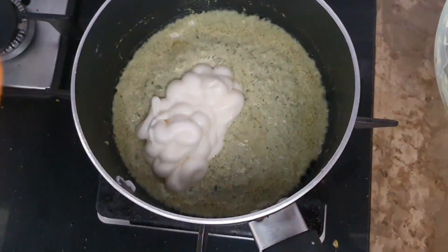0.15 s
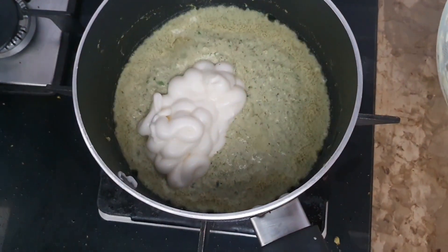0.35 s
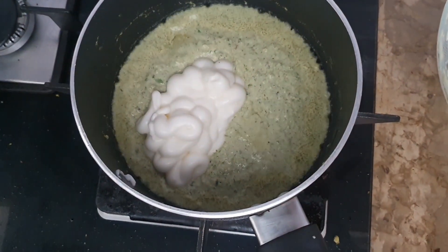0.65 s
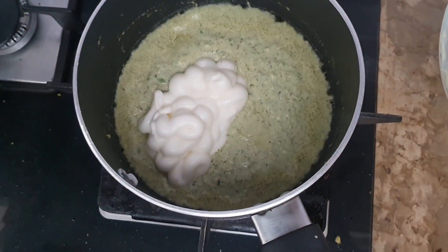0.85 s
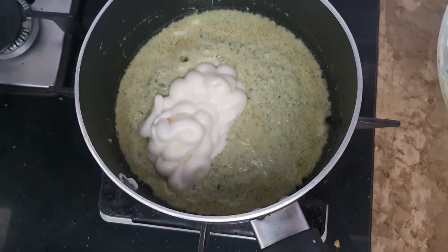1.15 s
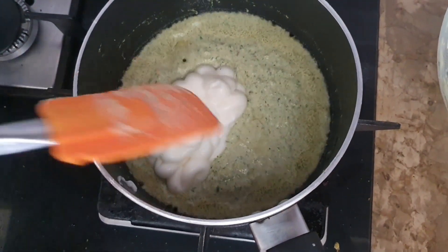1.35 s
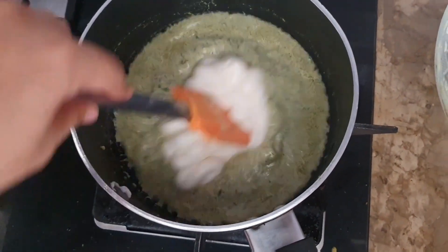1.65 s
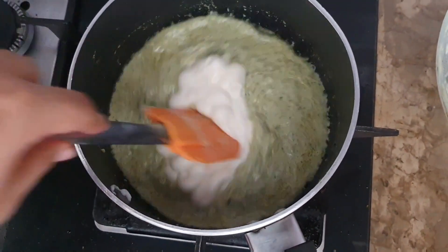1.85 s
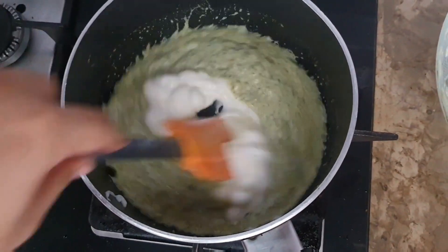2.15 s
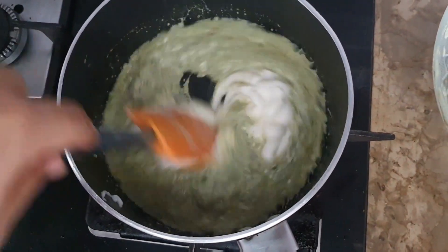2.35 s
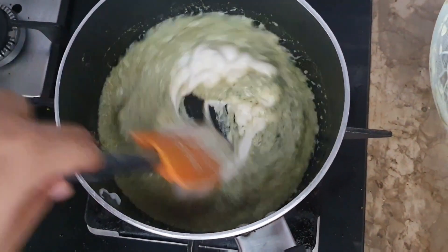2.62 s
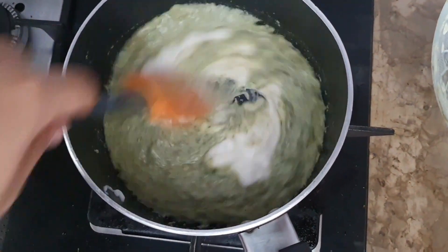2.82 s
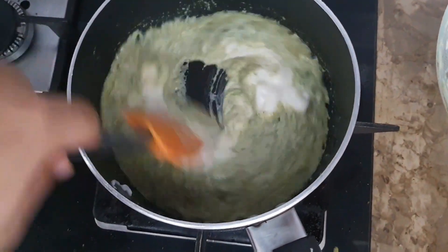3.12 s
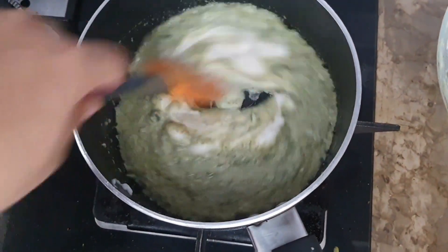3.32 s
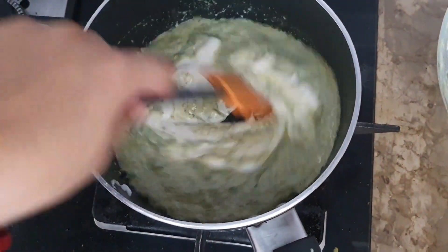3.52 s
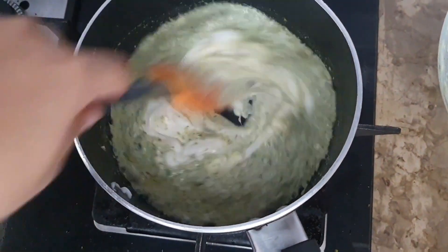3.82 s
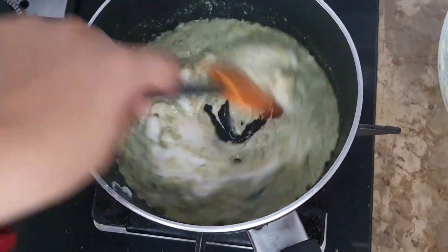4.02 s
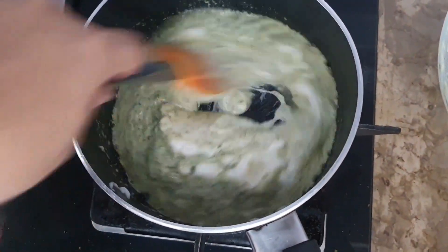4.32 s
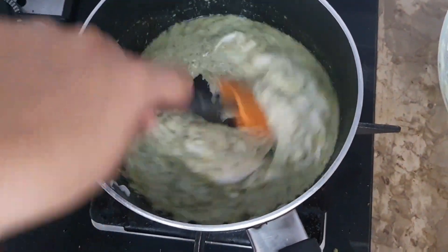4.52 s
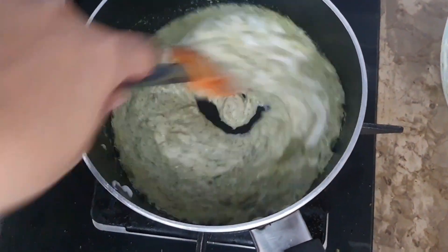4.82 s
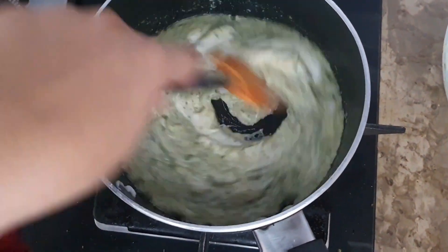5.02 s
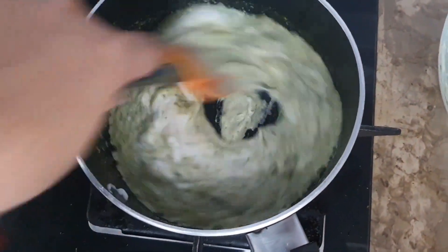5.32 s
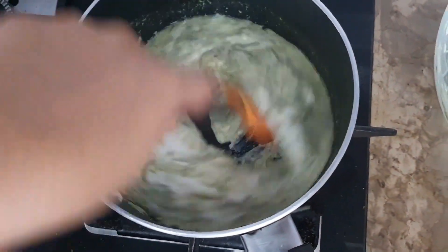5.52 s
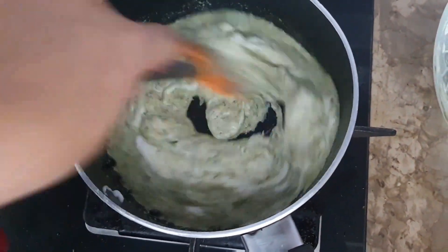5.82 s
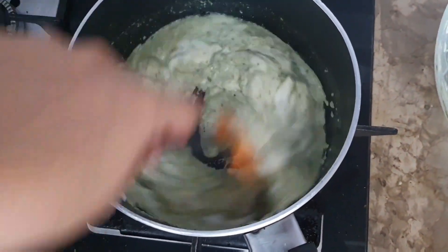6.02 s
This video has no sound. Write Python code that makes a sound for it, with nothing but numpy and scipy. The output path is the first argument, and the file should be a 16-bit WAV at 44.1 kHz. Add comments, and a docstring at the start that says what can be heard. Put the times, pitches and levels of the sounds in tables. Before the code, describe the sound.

Close, wet stirring of thick sauce in a non-stick pan: slippery swishes, brief squeaks and plops, growing duller and quieter towards the end.

```python
"""At a stove, close by, a silicone spatula stirs thick sauce round a non-stick saucepan.
The sauce squelches and the blade rubs the wet coating: noise made of tiny slips, shaped by steady and gliding bands.
The edge sings briefly where it catches (swelling tones), films snap (noise bursts) and pockets plop (rising tones).
The blade knocks softly on the pan, the pan rumbles and bumps on its grate, and a faint mains hum lies underneath."""
import sys
import numpy as np
from scipy import signal
from scipy.fft import rfft, irfft, next_fast_len
from scipy.io import wavfile
from scipy.ndimage import uniform_filter1d, map_coordinates

SR = 44100
rng = np.random.default_rng(int(sys.argv[2]) if len(sys.argv) > 2 else 0)


def unload_audio(sound):
    """Save the sound as a 16-bit wav file, at the path given as the first command line argument."""
    columns = np.transpose(np.atleast_2d(sound))
    # keep every value between -1 and 1, then stretch to whole-number steps
    steps = np.round(np.clip(columns, -1, 1) * 32767)
    wavfile.write(sys.argv[1], SR, steps.astype(np.int16))


N = 272008


def amp(db):
    """Level law: decibels to an amplitude gain."""
    return 10 ** (np.asarray(db) / 20)


def unit(x):
    """Power normalisation: scale to rms 1."""
    return x / np.sqrt(np.mean(x ** 2) + 1e-20)


def along(points, hz):
    """Spectral envelope: (Hz, value) points joined on a logarithmic frequency axis."""
    f, v = np.transpose(points)
    return np.interp(np.log(hz + 1), np.log(f + 1), v)


def curves(rows, t):
    """Temporal envelopes: each column after the time, interpolated at the times t."""
    s, *columns = np.transpose(rows)
    return [np.interp(t, s, column) for column in columns]


def wobble(rate):
    """Random modulation: a smooth curve through random knots, rate of them a second."""
    knots = rng.standard_normal(int(N * rate / SR) + 4)
    return map_coordinates(knots, [np.arange(N) * rate / SR])


def filtered(x, response):
    """Linear filtering: the spectrum of x times a response of frequency."""
    m = next_fast_len(N + SR // 2)
    return irfft(rfft(x, m) * response(np.fft.rfftfreq(m, 1 / SR)), m)[:N]


def bell(hz, centre, width):
    """Resonance: the power curve of one damped mode, width in Hz at half height."""
    return 1 / (1 + (2 * (hz - centre) / width) ** 2)


def swell(t, start, length, attack, release):
    """Linear envelope: rise from 0 to 1, hold and fall back."""
    return np.clip(np.minimum((t - start) / attack, (start + length - t) / release), 0, 1)


def add(track, s, sound):
    """Superposition: mix a sound into the track at s seconds."""
    part = track[max(round(s * SR), 0):][:len(sound)]
    part += sound[:len(part)]


HUM_HZ, HUM_DB = 100, -79  # rms level before it wavers


def mains_hum():
    """Periodic excitation: a pure tone whose level wavers slowly."""
    t = np.arange(N) / SR
    return amp(HUM_DB + 3 * wobble(9)) * unit(np.sin(2 * np.pi * HUM_HZ * t))


# Colour of the grate's rumble. Each row: frequency in Hz, relative level in dB.
GRATE_COLOUR = [(20, -33), (40, -34), (60, -1), (80, -3), (100, 11.5), (120, -8), (160, -5.5), (195, -4),
                (250, -5), (400, -2.5), (650, -7), (1200, -23.5)]
RUMBLE_DB, RUMBLE_FOLLOWS = -65, 0.2  # level at the mean push; dB of rumble per dB of push


def grate_rumble():
    """Structure-borne noise: the pan rumbles on its grate as the sauce is pushed."""
    t = np.arange(N) / SR
    push_db = curves(SAUCE_COURSE, t)[0] + strokes(t)[0]
    rocking = amp(RUMBLE_DB + RUMBLE_FOLLOWS * (push_db - push_db.mean()))
    return rocking * unit(filtered(rng.standard_normal(N), lambda hz: amp(along(GRATE_COLOUR, hz))))


# Bumps of the pan on its grate. Each row: crest in seconds, rms level at the crest in dB.
GRATE_BUMPS = [(1.305, -47.5), (2.53, -51.5), (3.07, -51), (3.15, -56), (3.91, -56), (4.03, -59),
               (5.87, -56), (6.01, -60)]
# Colour of a bump. Each row: frequency in Hz, relative level in dB.
THUD_COLOUR = [(20, -26), (45, -26), (70, -1), (110, 1), (150, -13.5), (220, -13.5), (400, -16.5),
               (700, -46)]
BUMP_S = 0.037  # from the crest to 1/e


def grate_bumps():
    """Impact noise: low noise swells and falls as the pan bumps on its grate."""
    t = np.arange(N) / SR
    bumps = sum(amp(db) * np.exp(-((t - s) / BUMP_S) ** 2) for s, db in GRATE_BUMPS)
    return bumps * unit(filtered(rng.standard_normal(N), lambda hz: amp(along(THUD_COLOUR, hz))))


def kitchen(x, t60=0.046):
    """Reverberation: a short decaying noise response answers from the hob and the walls."""
    t = np.arange(SR // 3) / SR
    tail = rng.standard_normal(len(t)) * amp(-60 * t / t60) * (t > .002)
    return signal.fftconvolve(x, tail / np.linalg.norm(tail))[:N]


# Soft knocks of the blade on the pan. Each row: start in seconds, peak level in dB.
BLADE_KNOCKS = [(5.9865, -27), (6.0005, -36)]
# Modes a knock excites. Each row: frequency in Hz, relative level in dB, 60 dB decay time in seconds.
PAN_KNOCK_MODES = [(572, -1.5, 0.13), (790, 4, 0.03), (1040, -2, 0.04), (1570, -3, .03), (2320, -5, 0.03)]


def knocks(splat_db=-8, splat_hz=820, splat_width_hz=600, splat_t60=0.07):
    """Modal impact: the soft blade bumps the pan and squashes sauce; the lowest mode rings longest."""
    t, out = np.arange(SR // 5) / SR, np.zeros(N)
    hz = np.fft.rfftfreq(len(t), 1 / SR)
    squash = 1 - np.exp(-t / .001)  # the silicone gives way first
    ring = sum(amp(db - 60 * t / t60) * np.sin(2 * np.pi * mode_hz * t)
               for mode_hz, db, t60 in PAN_KNOCK_MODES)
    for s, db in BLADE_KNOCKS:
        noise = rfft(rng.standard_normal(len(t)))
        splat = unit(irfft(noise * bell(hz, splat_hz, splat_width_hz) ** 2, len(t)))
        blow = squash * (ring + amp(splat_db - 60 * t / splat_t60) * splat)
        add(out, s, amp(db) * blow / np.abs(blow).max())
    return out


# Sauce pockets that plop shut behind the blade.
# Each row: start in seconds, level in dB before attack and decay, starting frequency in Hz.
POCKET_PLOPS = [(2.474, -16.5, 948), (3.121, -17, 1200), (3.135, -18, 830), (3.145, -13.5, 1140),
                (3.197, -16, 1230), (3.342, -24, 1150), (3.955, -26, 1140)]


def plops(t60=0.02, rise_per_s=6, attack_s=.0008):
    """Cavity resonance: a closing pocket rings briefly and rises in pitch as it shrinks."""
    t, out = np.arange(SR // 10) / SR, np.zeros(N)
    for s, db, hz in POCKET_PLOPS:
        phase = 2 * np.pi * np.cumsum(hz * (1 + rise_per_s * t)) / SR
        add(out, s, amp(db - 60 * t / t60) * (1 - np.exp(-t / attack_s)) * np.sin(phase))
    return out


# Bubbles and sauce films that snap.
# Each row: start in seconds, level in dB before the common gain and decay, centre frequency in Hz.
FILM_SNAPS = [(0.171, -40, 6960), (0.272, -39, 7300), (0.383, -38, 5500), (0.738, -28.5, 5060),
              (1.5702, -14, 4120), (1.599, -14.5, 4200), (1.6168, -20, 4000), (2.3724, -15, 3970),
              (2.725, -20, 4800), (3.0435, -22, 4330), (3.6689, -29, 5590), (3.775, -31, 7400),
              (4.9308, -25, 1710), (5.011, -35.5, 10300), (5.03, -35.5, 6900), (5.463, -27.5, 1400),
              (5.4858, -23, 4860), (5.631, -28, 3950)]


def snaps(t60=0.052, width_hz=1300, gain_db=-10):
    """Transient noise: each bursting film gives a short crack around its own pitch."""
    t, out = np.arange(SR // 10) / SR, np.zeros(N)
    hz = np.fft.rfftfreq(len(t), 1 / SR)
    for s, db, centre in FILM_SNAPS:
        noise = rfft(rng.standard_normal(len(t)))
        crack = unit(irfft(noise * bell(hz, centre, width_hz), len(t)))
        add(out, s, amp(db + gain_db - 60 * t / t60) * crack)
    return out


# Catches of the edge that make the pan sing. Each row: crest in seconds, rms level there in dB
# before flutter, frequency there in Hz before drift, time from the crest to 1/e in seconds.
EDGE_RINGS = [(0.455, -56.5, 734, 0.041), (0.505, -47.5, 2480, 0.025), (0.552, -46, 3530, 0.0082),
              (1.222, -35, 890, 0.043), (1.248, -27, 1590, 0.03), (1.772, -26, 1650, 0.008),
              (2.134, -30.5, 1513, 0.015), (3.312, -27.5, 1103, 0.015), (3.355, -31.5, 1344, 0.021)]


def rings(wander_hz=27, glide_hz_per_s=-100, rough_db=3):
    """Frictional excitation: each catch of the edge swells into a short, slightly unsteady tone."""
    t, out = np.arange(N) / SR, np.zeros(N)
    drift_hz, flutter_db = wander_hz * wobble(120), rough_db * wobble(140)
    for s, db, hz, length in EDGE_RINGS:
        phase = 2 * np.pi * np.cumsum(hz + drift_hz + glide_hz_per_s * (t - s)) / SR
        out += amp(db + flutter_db) * np.exp(-((t - s) / length) ** 2) * np.sqrt(2) * np.sin(phase)
    return out


# Strokes of the spatula over the slow course. Each row: start in seconds, length in seconds,
# lift of the sauce in dB, lift of the scrape in dB, lift of the hiss and fizz in dB.
SPATULA_STROKES = [(0.429, 0.22, 2, 12, 5.5), (1.122, 0.27, 3, 4.5, 2.5), (1.34, 0.39, 2, 6, 4.5),
                   (1.68, 0.19, 6, 3.5, 0.5), (1.898, 0.28, -1, 7.5, 7), (2.342, 0.26, 4.5, 7, 1.5),
                   (2.688, 0.13, -3.5, 1, 3.5), (3.023, 0.27, 7, -1.5, -3), (3.227, 0.26, 4.5, -1, -3),
                   (3.74, 0.093, 3, 11, 3), (3.808, 0.28, 3, 5, 2), (4.189, 0.23, 5.5, 4.5, 8),
                   (4.438, 0.22, 5, 1.5, 5), (4.594, 0.31, 6.5, 1.5, 3.5), (4.798, 0.15, 6, 9.5, 7),
                   (5.053, 0.21, 3.5, 3.5, 1), (5.426, 0.14, 3.5, -1.5, 3), (5.588, 0.17, 1.5, 3, -2.5),
                   (5.81, 0.19, 2.5, 2.5, 0), (6.086, 0.144, -4.5, 9, 4)]
STROKE_ATTACK_S, STROKE_RELEASE_S = 0.055, 0.083


def strokes(t):
    """Amplitude modulation: the dB lifts that strokes give to the sauce, the scrape and the spray."""
    return sum(np.outer(lifts, swell(t, s, length, STROKE_ATTACK_S, STROKE_RELEASE_S))
               for s, length, *lifts in SPATULA_STROKES)


BAND_FADE_S = 0.05  # each band comes and goes over this time


def moving_bands_db(rows, hz, t):
    """Time-varying filtering: bands that swell, hold steady or glide, and fade, frequency by time."""
    return sum(db * swell(t, s, length, BAND_FADE_S, BAND_FADE_S)
               * bell(hz, np.interp(t, [s, s + length], [from_hz, to_hz]), width)
               for s, length, from_hz, to_hz, width, db in rows)


# Brief squeaks and gulps, where a cavity or the edge rings. Each row: crest in seconds,
# frequency in Hz, width in Hz, time in seconds from the crest to 1/e of the lift, lift in dB.
BRIEF_SQUEAKS = [(0.396, 4270, 900, 0.039, 8), (0.526, 2290, 300, .06, 12.5), (0.527, 3550, 500, 0.11, 11),
                 (0.97, 1340, 170, 0.04, 9), (2.13, 1516, 250, 0.045, 14.5), (2.37, 4060, 475, 0.026, 8),
                 (2.464, 1320, 500, 0.039, 10), (2.563, 5600, 350, 0.09, 10), (2.655, 2630, 400, 0.035, 12),
                 (3.317, 3050, 400, 0.059, 14.5), (3.334, 1244, 200, 0.1, 15.5),
                 (3.444, 1030, 350, 0.016, 13.5), (3.945, 1050, 450, 0.016, 9.5),
                 (5.499, 780, 380, 0.038, 12), (5.51, 4580, 600, .025, 15), (5.528, 13400, 2800, 0.046, 14),
                 (5.642, 3800, 550, 0.032, 14), (5.804, 1550, 250, 0.019, 11),
                 (6.066, 9450, 1800, 0.026, 19), (6.112, 1510, 500, 0.021, 10.5)]


def squeak_db(hz, t):
    """Transient resonance: the lift of the brief squeaks, frequency by time."""
    return sum(db * bell(hz, centre, width) * np.exp(-((t - s) / length) ** 2)
               for s, centre, width, length, db in BRIEF_SQUEAKS)


# The pan's resonances, damped by the sauce. Each row: frequency in Hz, width in Hz, lift in dB.
PAN_RESONANCES = [(687, 70, 3.5), (860, 54, 3), (1193, 40, 3), (1616, 170, 2), (2385, 110, 3),
                  (3217, 130, 5.5), (3985, 170, 3.5), (4710, 100, 4), (5560, 120, 3.5), (7300, 150, 2.5)]
# Bands that stand out in the rubbing, steady or gliding. Each row: start in seconds,
# length in seconds, starting frequency in Hz, final frequency in Hz, width in Hz, lift in dB.
STRONG_BANDS = [(0.524, 0.59, 5050, 5150, 500, 5), (0.62, 0.53, 1630, 1630, 170, 5),
                (0.82, 0.26, 2790, 2850, 800, 10), (1.337, 0.28, 3960, 4180, 700, 12.5),
                (1.545, 0.27, 4180, 3860, 754, 17), (1.897, 0.45, 3910, 3970, 940, 17),
                (2.333, 0.18, 4220, 2930, 1250, 16), (2.026, 0.19, 7668, 9300, 1728, 6.5),
                (2.247, 0.81, 9200, 9600, 1631, 16), (2.025, 0.23, 12100, 12600, 1600, 12),
                (2.24, 0.34, 12600, 13400, 1900, 15), (2.72, 0.33, 12700, 14300, 1300, 14),
                (3.19, 0.38, 9300, 10700, 1728, 10), (3.548, 1.6, 10300, 10800, 1310, 8.5),
                (3.6, 1.8, 14500, 14900, 1700, 2.5), (2.85, 1.2, 2470, 2550, 900, 4),
                (3.738, 2.04, 2480, 2150, 1000, 5), (5.04, 0.18, 3500, 4300, 1500, 6),
                (3.54, 1.4, 1650, 1580, 162, 1.5), (5.35, 0.37, 1610, 1700, 190, 13),
                (6.08, 0.22, 2680, 5000, 1400, 15)]
# Bands where the rubbing is weaker. Each row: start in seconds, length in seconds,
# starting frequency in Hz, final frequency in Hz, width in Hz, cut in dB.
WEAK_BANDS = [(0.0, 0.64, 10200, 11200, 1500, 5), (0.3, 2.1, 620, 600, 180, 6),
              (3.5, 1.8, 9100, 9400, 1020, 4.5), (4, 2, 12700, 12600, 1300, 7),
              (5.5, 0.6, 13500, 14360, 4000, 3)]
# the low-mid part of the rubbing grows later
LATE_LOW_HZ, LATE_LOW_WIDTH_HZ, LATE_LOW_DB = 263, 880, 12
FOLD_S = 2.9  # the cream folds in around this time


def resonance_db(hz, t):
    """Modal filtering: pan modes, later low-mids, strong and weak bands, frequency by time."""
    lift = sum(db * bell(hz, centre, width) for centre, width, db in PAN_RESONANCES)
    growth = np.interp(t, [FOLD_S - .5, FOLD_S + 2], [0, 1])
    lift = lift + LATE_LOW_DB * growth * bell(hz, LATE_LOW_HZ, LATE_LOW_WIDTH_HZ)
    return lift + moving_bands_db(STRONG_BANDS, hz, t) - moving_bands_db(WEAK_BANDS, hz, t)


def slips(rate, spread_db, share):
    """Stick-slip noise: pops of uneven size, with a share of the power, over a smooth rub."""
    sizes = rng.standard_normal(N) * amp(spread_db * np.clip(rng.standard_normal(N), -2, 2))
    pops = unit(sizes * (rng.random(N) < rate / SR))
    share = np.clip(share, 0, 1)
    return np.sqrt(share) * pops + np.sqrt(1 - share) * rng.standard_normal(N)


SMOOTH_SHARE, LUMPY_SHARE = 0.5, 0.87  # share of the full pocket depth before and after the fold


def rub(drive, colour, patchy_db, size):
    """Source and filter: slips pass resonances and shifting pockets (size bins wide).
    The gain has rms 1 over frequency at each instant; squeaks stand out above that."""
    hz, t, z = signal.stft(drive, SR, nperseg=1024)
    pockets = uniform_filter1d(rng.standard_normal(z.shape), size=size, axis=0)
    pockets = uniform_filter1d(pockets, size=5, axis=1)
    # the sauce tears into deeper pockets as the cream folds in
    lumpy = np.interp(t, [FOLD_S - .5, FOLD_S + .5], [SMOOTH_SHARE, LUMPY_SHARE])
    pocket_db = patchy_db * lumpy * unit(pockets)
    gain = amp(along(colour, hz)[:, None] + resonance_db(hz[:, None], t) + pocket_db)
    gain = gain / np.sqrt(np.mean(gain ** 2, axis=0)) * amp(squeak_db(hz[:, None], t))
    return signal.istft(z * gain, SR, nperseg=1024)[1][:N]


# Slow course of the pushed sauce, before stroke lifts and flutter.
# Each row: time in seconds, squelch level in dB, deep slosh in dB relative to it before a small trim.
SAUCE_COURSE = [(0.0, -76.5, 0.5), (0.26, -70.5, -3), (0.36, -59, -2), (0.96, -40.5, -12.5),
                (1.33, -38, -3), (2.22, -33, -6.5), (2.76, -39.5, -2.5), (2.9, -35.5, -9),
                (3.05, -36.5, -2.5), (3.42, -42, -2.5), (3.55, -41, -7.5), (4.09, -43.5, -3),
                (4.44, -49.5, -5.5), (5.1, -50.5, -3), (5.38, -46, -8.5), (5.64, -42.5, -6),
                (5.74, -48, -1), (6.17, -50.5, 2.5)]
# Colours of the slosh and the squelch. Each row: frequency in Hz, relative level in dB.
SLOSH_COLOUR = [(40, -46), (150, -24), (200, -22), (344, -17.5), (440, -13.5), (570, -13.5), (680, -6),
                (800, 1), (1150, 4), (1300, -45), (1600, -57)]
SQUELCH_COLOUR = [(850, -48), (1150, -5), (1540, 2), (1760, -4), (2000, -8.5), (2400, -38), (5000, -53)]


def sauce(push_db):
    """Viscous flow noise: the pushed sauce sloshes deeply and squelches in the pan's hollow."""
    squelch_db, depth_db = curves(SAUCE_COURSE, np.arange(N) / SR)
    slosh_slips = slips(rate=700, spread_db=2.8, share=0.3)
    slosh = amp(depth_db - 0.52) * rub(slosh_slips, SLOSH_COLOUR, patchy_db=3.8, size=5)
    squelch_slips = slips(rate=860, spread_db=2.5, share=0.37)
    squelch = rub(squelch_slips, SQUELCH_COLOUR, patchy_db=3.5, size=7)
    return amp(squelch_db + push_db + 0.48 * wobble(16)) * (slosh + squelch)


TEARS_PER_S, TEAR_S, TEAR_SIZE = 36, 0.006, 0.33  # rate; decay to 1/e; jump scale over the steady gain


def tearing():
    """Shot noise: a gain of rms 1 jumps each time a wet film tears and dies away quickly."""
    jumps = TEAR_SIZE * np.minimum(rng.exponential(size=N), 2) * (rng.random(N) < TEARS_PER_S / SR)
    return unit(1 + signal.lfilter([1], [1, -np.exp(-1 / (TEAR_S * SR))], jumps))


# Slow course of the blade's rubbing, duller once the cream is folded in; before trims, strokes and
# flutter. Each row: time in seconds, scrape level in dB, hiss level in dB, fizz level in dB.
BLADE_COURSE = [(0.0, -81, -61.5, -57), (0.32, -74, -59, -59), (0.37, -70, -54.5, -56.5),
                (0.89, -41.5, -42, -43), (1.61, -35.5, -36.5, -43.5), (1.97, -38.5, -32.5, -46.5),
                (2.26, -29.5, -31.5, -38), (2.62, -37, -36, -38), (2.8, -39.5, -39.5, -38),
                (3.05, -36.5, -39.5, -47), (3.3, -39, -40, -41), (3.55, -43.5, -45, -54),
                (3.7, -46.5, -48.5, -58), (3.82, -44.5, -46, -53), (4.15, -46.5, -50.5, -54.5),
                (4.41, -56, -54.5, -66), (4.59, -47, -57, -60.5), (4.89, -50, -53, -59),
                (4.95, -54, -60, -65), (5.24, -54, -53.5, -58.5), (5.46, -47, -60, -62),
                (5.51, -47, -51, -53), (5.85, -47, -53, -57), (6.17, -51, -56, -58)]
# Colours of the scrape, the hiss and the fizz. Each row: frequency in Hz, relative level in dB.
SCRAPE_COLOUR = [(1500, -29), (2000, -2), (2390, 1), (2900, -3.5), (3550, -4.5), (4700, -2), (5500, -22),
                 (9000, -50)]
HISS_COLOUR = [(4200, -44), (4850, -0.5), (5780, 1), (7170, 0), (8100, -13.5), (8600, -15.5), (10500, -56)]
FIZZ_COLOUR = [(4000, -43), (6000, -22.5), (8400, -3), (9880, -5.5), (12300, -8), (14400, -8), (15500, -14)]
RUB_PATCHY_DB = 3.5  # how unevenly the coating rubs across the spectrum, at full pocket depth


def blade(press_db, spray_db):
    """Sliding friction: the blade scrapes the wet coating while tearing films hiss and fizz."""
    scrape_db, hiss_db, fizz_db = curves(BLADE_COURSE, np.arange(N) / SR)
    scrape_slips = slips(rate=1400, spread_db=1.5, share=0.37)
    scrape = rub(scrape_slips, SCRAPE_COLOUR, patchy_db=RUB_PATCHY_DB, size=13)
    scrape = amp(scrape_db + press_db - 0.46) * scrape
    wet = slips(rate=1400, spread_db=0.0, share=0.22)  # one crackle runs through the whole treble
    hiss = amp(hiss_db - 1.46) * rub(wet, HISS_COLOUR, patchy_db=RUB_PATCHY_DB, size=15)
    fizz = amp(fizz_db - 3.0) * rub(wet, FIZZ_COLOUR, patchy_db=RUB_PATCHY_DB, size=22)
    spray = (hiss + fizz) * tearing() * amp(spray_db + 0.88 * wobble(55))
    return scrape + spray


def stirring():
    """Common modulation: strokes push sauce and blade, and the sticky drag flutters both together."""
    push_db, press_db, spray_db = strokes(np.arange(N) / SR)
    return (sauce(push_db) + blade(press_db, spray_db)) * amp(0.84 * wobble(40))


def scene():
    """Direct and reverberant sound: the pan close by, a little of the kitchen, and the stove."""
    pan = stirring() + rings() + snaps() + plops() + knocks()
    stove = grate_rumble() + grate_bumps() + mains_hum()
    return (pan + amp(-14.5) * kitchen(pan) + stove)[None]


# An instant of silence. The row: start in seconds, end in seconds.
DROPOUT = (4.4005, 4.407)
TOP_HZ = 15650  # band limit


def record(dry):
    """Gating and band limiting: the sound drops out for an instant; nothing passes above the limit."""
    t = np.arange(N) / SR
    live = (t < DROPOUT[0]) | (t > DROPOUT[1])
    return filtered(dry[0] * live, lambda hz: hz < TOP_HZ)[None]


dry = scene()
out = record(dry)
unload_audio(out)
```